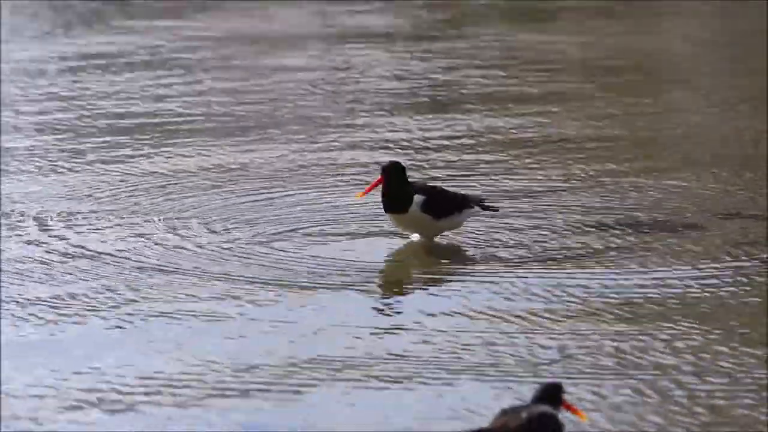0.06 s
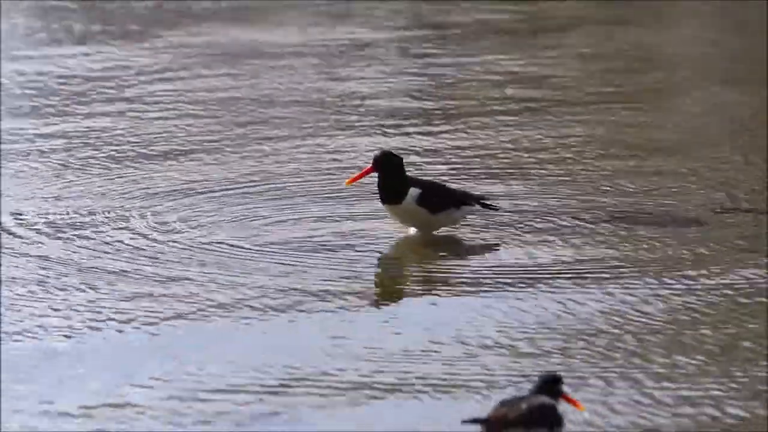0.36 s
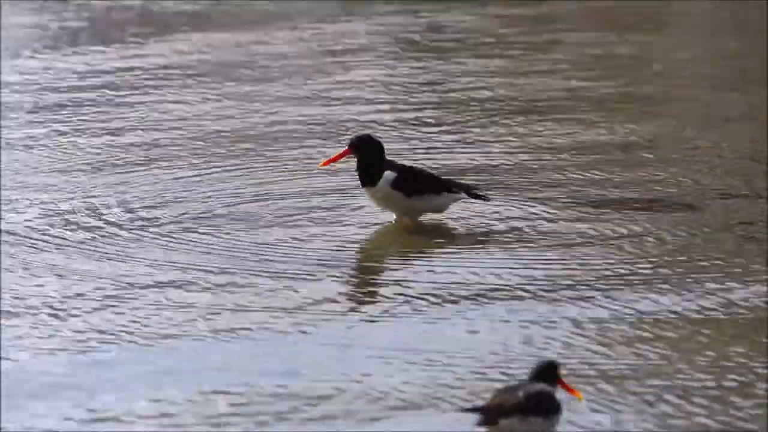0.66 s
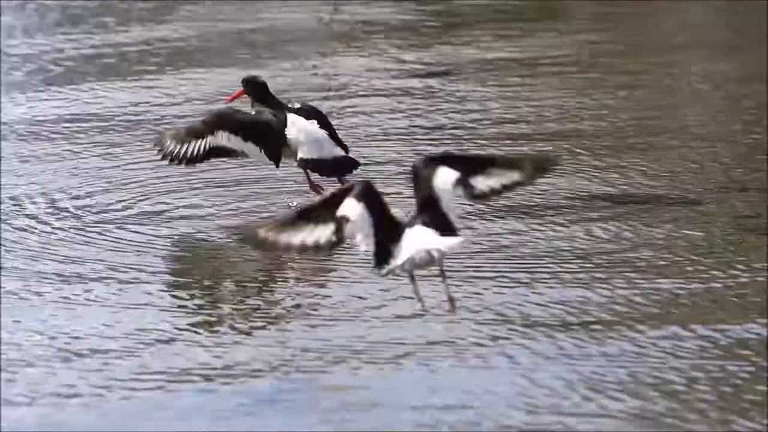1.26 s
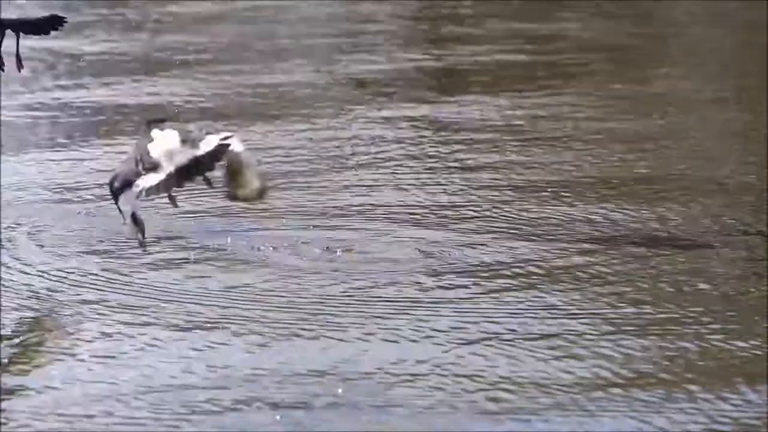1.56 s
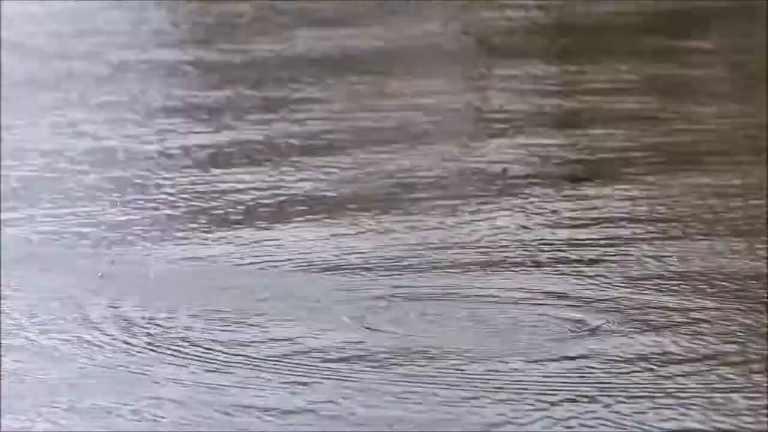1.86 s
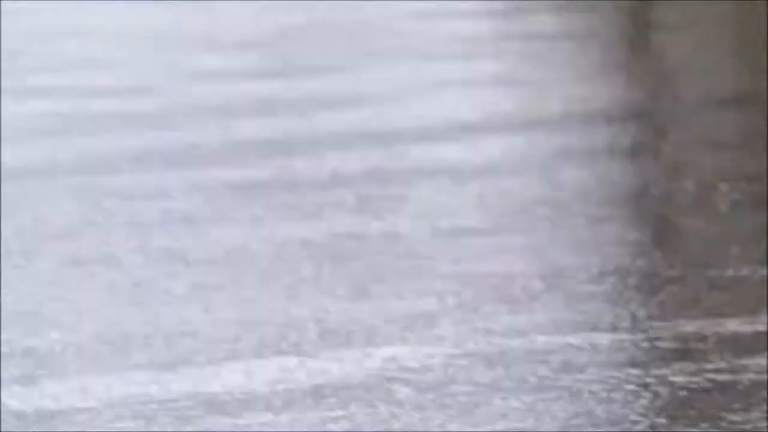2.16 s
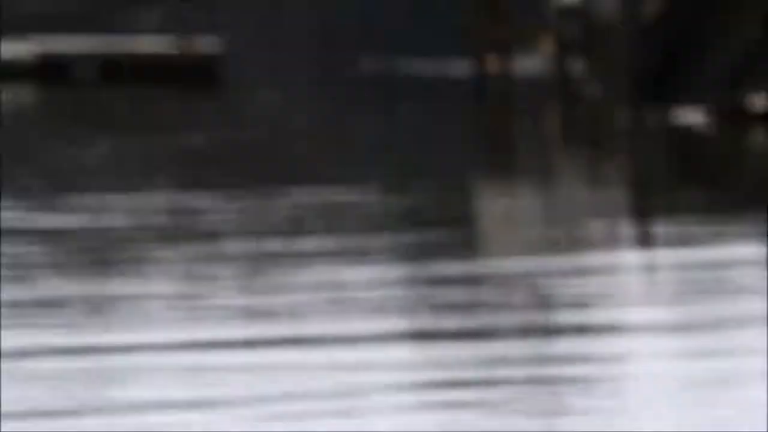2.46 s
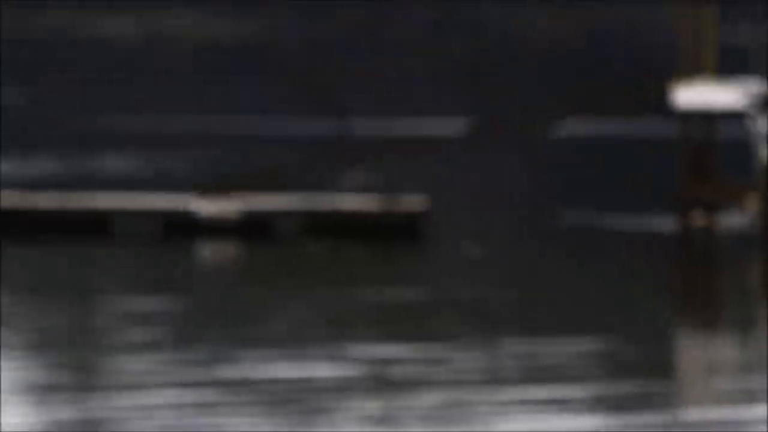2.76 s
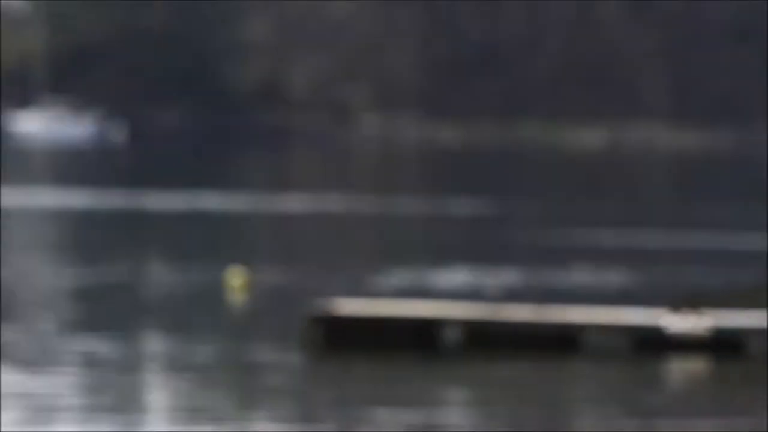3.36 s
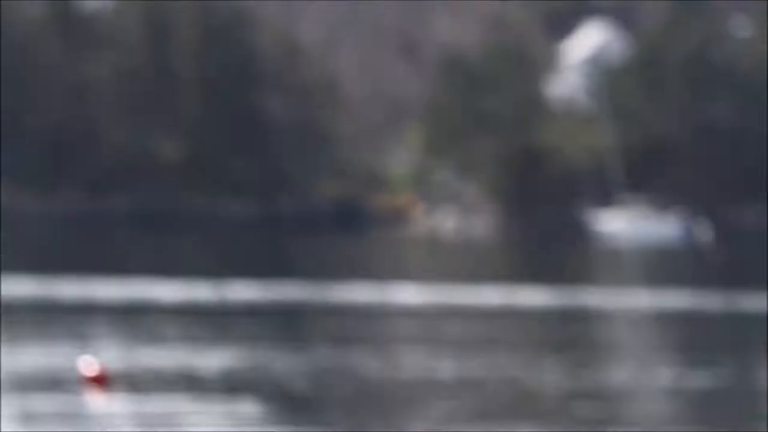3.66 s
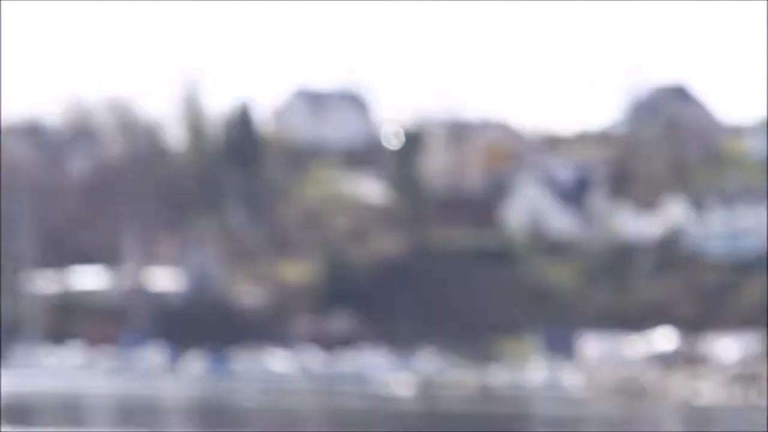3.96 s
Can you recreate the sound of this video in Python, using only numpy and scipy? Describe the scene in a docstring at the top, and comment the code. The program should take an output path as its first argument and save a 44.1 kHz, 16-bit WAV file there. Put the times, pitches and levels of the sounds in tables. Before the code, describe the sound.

Oystercatchers call on a quiet shore: one harsh rasp, then swishing wing beats with faint splashes and short chips, and finally two loud piping whistles with a slight echo. Ripples lap and light wind buffets the microphone.

```python
"""Light wind buffets the microphone and ripples lap on a quiet shore, where oystercatchers are wading. One
gives a harsh, rasping call that ends in a short clear note; they take off with swishing wing beats, drops and
spray, and chip in flight, with two faint bird notes far away. Two loud two-part piping whistles close the
scene, and the shore scatters them back slightly raised in pitch by the bird's flight."""
import sys
import numpy as np
from scipy import signal
from scipy.io import wavfile
from scipy.ndimage import uniform_filter1d

SR = 44100
rng = np.random.default_rng(int(sys.argv[2]) if len(sys.argv) > 2 else 0)


def unload_wav(signal):
    """Save mono or channel-first audio to the path in sys.argv[1] as 16-bit WAV at rate SR, clipped to [-1, 1]."""
    wavfile.write(
        sys.argv[1],
        SR,
        np.round(np.clip(np.atleast_2d(signal).T, -1, 1) * 32767).astype(np.int16),
    )


N = 176400
TIME = np.arange(N) / SR
STIRRED = TIME > 1.151   # the birds stir the water from just before the first wing beat


def from_db(db):
    """Decibels to gain."""
    return 10 ** (np.asarray(db) / 20)


def unit_rms(x):
    """Scale to rms 1."""
    return x / np.sqrt(np.mean(x ** 2) + 1e-20)


def curves(rows):
    """Draw one curve for each column after the time column."""
    times, *columns = np.transpose(rows)
    return [np.interp(TIME, times, column) for column in columns]


def eq_db(eq, hz):
    """Read an EQ curve on a log frequency axis."""
    freqs, gains_db = np.transpose(eq)
    return np.interp(np.log(hz), np.log(freqs), gains_db)


def gate(rows):
    """Open from the first row to the last, with 2 ms fades."""
    return np.clip(np.minimum(TIME - rows[0][0], rows[-1][0] - TIME) / .002, 0, 1)


def drift(rate_hz):
    """Smooth random modulation at rms 1, made at a twentieth of the sample rate."""
    pole = np.exp(-40 * np.pi * rate_hz / SR)
    slow = signal.lfilter([1], [1, -2 * pole, pole * pole], rng.standard_normal(N // 20 + 2002))[2000:]
    return np.interp(np.arange(N) / 20, np.arange(len(slow)), unit_rms(slow))


def resonate(x, hz, width_hz):
    """A resonant band-pass with unity gain at its peak."""
    r = np.exp(-np.pi * width_hz / SR)
    feedback = [1, -2 * r * np.cos(2 * np.pi * hz / SR), r * r]
    return signal.lfilter(np.array([1, 0, -1]) * (1 - r * r) / 2, feedback, x + 1e-18)


def noise(eq):
    """Noise in roughly half-octave bands, each flickering by itself; rms 1."""
    low, high = eq[0][0], min(eq[-1][0], SR * .45)
    edges = np.geomspace(low, high, int(2 * np.log2(high / low)) + 2)
    out, white = 0, rng.standard_normal((2, N))
    for k, band in enumerate(zip(edges, edges[1:])):
        gain = from_db(eq_db(eq, np.sqrt(band[0] * band[1])) + 1.5 * drift(25))
        out += gain * signal.sosfilt(signal.butter(2, band, "band", fs=SR, output="sos"), white[k % 2])
    return unit_rms(out)


def grains(eq, per_s, spread_db, cycles, pitches):
    """Random clicks of uneven size, each ringing at one of the pitches for about `cycles`; rms 1."""
    hits = rng.random(N) < per_s / SR
    clicks = hits * from_db(spread_db * np.minimum(rng.exponential(1, N), 4)) * rng.choice([-1, 1], N)
    out, dealt = 0, rng.integers(0, pitches, N)
    for k, hz in enumerate(np.geomspace(eq[1][0], eq[-2][0], pitches)):
        out += from_db(eq_db(eq, hz)) * resonate(clicks * (dealt == k), hz, 1.35 * hz / cycles)
    return unit_rms(out)


# The wind's fader. Each row: time in seconds, relative level in dB.
WIND_FADER = [(0, -64), (.5, -55.5), (.56, -54.5), (1.08, -52), (1.17, -45), (2.08, -46), (2.55, -50.5),
              (2.8, -42.5), (3.72, -50), (3.82, -51)]
# Its low rumble. Each row: frequency in Hz, gain in dB.
WIND_EQ = [(20, -10), (40, -1.5), (70, 3), (130, -4), (200, -7.5), (300, -26), (500, -26)]
# Thumps of air. Each row: centre in seconds, level in dB, half-width in seconds.
BUFFETS = [(0.558, -35, 0.022), (0.757, -27, 0.004), (1.12, -33.5, 0.0081), (1.188, -34, 0.011),
           (1.346, -31.5, 0.0076), (1.459, -26.5, 0.0041), (1.499, -25.5, 0.018), (1.528, -22.5, 0.0028),
           (1.551, -29, 0.0083), (1.678, -37, 0.0091), (1.824, -40, 0.013), (2.025, -39, 0.0067),
           (2.054, -30, 0.008), (2.111, -35, 0.01), (2.158, -30.5, 0.0096), (2.864, -29, 0.0069),
           (3.078, -30.5, 0.01), (3.377, -29, 0.0084), (3.733, -25, 0.0095)]

def wind(buffet_hz=117.2):
    """Wind on the microphone: a lumpy rumble, with eddies that hit as short, low buffets."""
    db, = curves(WIND_FADER)
    out = from_db(db + 5.5 + 2.5 * drift(7.2)) * noise(WIND_EQ)
    for centre, level_db, half_width in BUFFETS:
        swell = np.exp(-.5 * np.minimum(((TIME - centre) / half_width) ** 2, 100))
        rumble = resonate(rng.standard_normal(N), buffet_hz, width_hz=55)
        eddy = swell * resonate(rumble, buffet_hz, width_hz=110)
        out += from_db(level_db) * eddy * np.sqrt(np.sum(swell ** 2) / np.sum(eddy ** 2))
    return out


# The ripples' fader. Each row: time in seconds, relative level in dB.
LAP_FADER = [(0, -54), (1.0, -54), (1.53, -51.5), (1.85, -51.5), (2.55, -54), (3.15, -52.5), (3.3, -44),
             (3.45, -53.5), (3.67, -46.5), (3.8, -51)]
# Their dark wash. Each row: frequency in Hz, gain in dB.
LAP_EQ = [(250, 4.5), (400, -0.5), (650, -4), (1000, -4), (1900, -8), (3000, -20.5), (5000, -23)]

def lapping():
    """Ripples wash the shore; small bubbles ring in them once the birds stir the water."""
    db, = curves(LAP_FADER)
    wash = from_db(1) * noise(LAP_EQ)
    bubbles = from_db(-4.5) * grains(LAP_EQ, per_s=180, spread_db=2.2, cycles=17, pitches=24)
    return from_db(db) * (wash + STIRRED * bubbles)


# The fader for trickle and spray. Each row: time in seconds, relative level in dB.
SPRAY_FADER = [(0, -66), (1.1, -66.5), (1.2, -60.5), (1.5, -60.5), (1.9, -60), (2.1, -62), (2.9, -67.5),
               (3.25, -60), (3.5, -61), (4.0, -60.5)]
# Their bright fizz. Each row: frequency in Hz, gain in dB.
SPRAY_EQ = [(2500, 0.5), (4000, -3.5), (7000, -7.5), (11000, -7.5), (13500, -10), (15800, -4)]

def spray():
    """A thin trickling hiss, joined by fine ticking droplets from the take-off on."""
    db, = curves(SPRAY_FADER)
    hiss = from_db(4.5) * noise(SPRAY_EQ)
    droplets = from_db(-1) * grains(SPRAY_EQ, per_s=700, spread_db=7.5, cycles=4, pitches=14)
    return from_db(db) * (hiss + STIRRED * droplets)


# The harsh call's contour. Each row: time in seconds, pitch in Hz, relative level in dB,
# buzz in dB (the gain on every harmonic but the leading one).
HARSH_CONTOUR = [(.558, 353, -57, 6), (.573, 361, -41.5, -3), (.60, 404.4, -39.5, -1),
                 (.65, 397.5, -39, -4), (.70, 384.3, -44.5, 2), (.75, 370, -42, -3.5),
                 (.81, 367.5, -41.5, -5.5), (.85, 343, -43, -10), (.885, 345, -40, -11),
                 (.925, 345.6, -48, -6)]
# The throat's formants. Each row: frequency in Hz, gain in dB.
THROAT_EQ = [(800, -23), (1200, -10.5), (1520, -21), (1680, -1), (1900, 0), (2400, -8), (2540, -28),
             (2750, -11), (2980, -22), (3130, -17), (3700, -30)]

def harsh_call(leading_harmonic=5, rasp_sweep=.13, rasp_depth=.25):
    """A buzzing voice that clears as it falls; each rasp cycle sweeps its pitch up and chokes it."""
    pitch, db, buzz_db = curves(HARSH_CONTOUR)
    rasp_hz = 64 - 23 * (TIME - HARSH_CONTOUR[0][0])
    cycle = np.cumsum(rasp_hz) / SR % 1
    sweep = 1 + rasp_sweep * (uniform_filter1d(cycle, size=150) - .5)
    hz = pitch * sweep * (1 + .008 * drift(390))
    phase = 2 * np.pi * np.cumsum(hz) / SR
    voice = 0
    for k in range(2, 10):
        harmonic_db = eq_db(THROAT_EQ, k * hz) + (k != leading_harmonic) * (buzz_db + 2.5 * drift(200))
        voice += np.sqrt(2) * from_db(harmonic_db) * np.sin(k * phase + .5 * drift(60))
    breath = .15 * unit_rms(resonate(rng.standard_normal(N), hz=1830, width_hz=140))
    choke = 1 - rasp_depth * np.cos(2 * np.pi * cycle)
    return (voice + breath) * choke * from_db(db) * gate(HARSH_CONTOUR)


# Short chips. Each row: peak time, rise and fall in seconds, top pitch in Hz, pitch sag at the start
# and at the end as fractions, then the levels of harmonics 1 to 5 in dB.
CHIPS = [(0.91, .06, 0.057, 1186, 0.15, 0.15, -63, -47, -60.5, -72, -71),
         (1.711, 0.024, 0.0057, 2592, 0.15, .04, -42.5, -49.5, -50.5, -49, -50),
         (2.127, 0.016, .025, 2673, .13, .14, -53.5, -35, -59, -46.5, -53),
         (2.961, 0.023, 0.0068, 2690, 0.77, 0.087, -40.5, -53.5, -73, -59, -57),
         (3.695, 0.019, 0.017, 2710, .13, 0.15, -43, -51, -63, -78, -81)]

def chips():
    """Short notes rich in fluttering overtones, each one lopsided arch of pitch and level."""
    out, waver = 0, 1 + .009 * drift(170)
    flutters = [from_db(3.5 * drift(150)) for _ in range(5)]
    for peak, rise, fall, top_hz, start_sag, end_sag, *levels in CHIPS:
        rising = TIME < peak
        droop = np.clip((TIME - peak) / np.where(rising, rise, fall), -1, 1) ** 2
        hz = top_hz * (1 - np.where(rising, start_sag, end_sag) * droop) * waver
        phase = 2 * np.pi * np.cumsum(hz) / SR
        tone = sum(from_db(db) * flutters[k - 1] * np.sin(k * phase) for k, db in enumerate(levels, 1))
        out += np.sqrt(2) * (1 - droop) * tone
    return out


# The hollow tone of churned water. Each row: frequency in Hz, gain in dB.
CHURN_EQ = [(250, -6), (330, 6), (450, 5), (700, -21.5), (1000, -14)]

def churn(centre_s=1.518, half_width_s=.21):
    """Low gurgles swell and fade as the birds push off."""
    swell = from_db(-44) * np.exp(-.5 * ((TIME - centre_s) / half_width_s) ** 2)
    return swell * grains(CHURN_EQ, per_s=150, spread_db=3.7, cycles=17.9, pitches=10)


# Single drops and plops. Each row: start in seconds, peak level in dB, pitch in Hz.
DROPS = [(1.247, -36.5, 4200), (1.317, -36.5, 6500), (1.354, -42, 3700), (1.452, -35.5, 2170),
         (1.661, -37, 3240), (1.775, -33, 3900), (1.8, -43, 7460), (1.992, -36.5, 8460),
         (2.021, -31.5, 4360), (2.255, -34.5, 4860), (2.667, -37, 1220), (2.903, -40, 820),
         (3.292, -33.5, 10000), (3.937, -23.5, 890)]

def drops(t60_s=.02):
    """Each drop is a tiny splat that rings briefly."""
    out = 0
    for start, db, hz in DROPS:
        decay = (TIME >= start) * from_db(-60 * np.clip((TIME - start) / t60_s, 0, 2))
        plop = resonate(decay * rng.standard_normal(N), hz, width_hz=.27 * hz)
        out += from_db(db) * plop / np.max(np.abs(plop) + 1e-12)
    return out


# Downstrokes. Each row: centre in seconds, relative level in dB.
WING_BEATS = [(1.251, -37), (1.356, -35), (1.461, -38), (1.568, -42), (1.671, -42), (1.779, -41.5),
              (1.888, -48)]
# Their airy swish. Each row: frequency in Hz, gain in dB.
SWISH_EQ = [(300, 0), (1500, 5.5), (4000, 9.5), (8000, 1.5), (12000, -3), (15500, -11)]

def wings():
    """Each downstroke is a brief, crackly swish, softer-edged as the bird climbs away."""
    strokes = 0
    for centre, db in WING_BEATS:
        half_width_s = .004 + .007 * (centre - WING_BEATS[0][0])
        strokes += from_db(db - 5) * np.exp(-.5 * ((TIME - centre) / half_width_s) ** 2)
    swish = noise(SWISH_EQ)
    crackle = from_db(-1) * grains(SWISH_EQ, per_s=2600, spread_db=5, cycles=5.2, pitches=12)
    return strokes * (swish + crackle)


# Distant calls. Each row: centre in seconds, length in seconds, pitch in Hz, level in dB.
FAR_CALLS = [(2.087, 0.11, 1708, -53.5), (3.107, .1, 1970, -58)]

def far_birds():
    """Thin wavering notes from across the water."""
    out, waver = 0, 1 + .025 * drift(120)
    for centre, length, hz, db in FAR_CALLS:
        arch = np.clip(1 - (2 * (TIME - centre) / length) ** 2, 0, 1)
        out += from_db(db) * arch * np.sqrt(2) * np.sin(2 * np.pi * np.cumsum(hz * waver) / SR)
    return out


# The two piping calls, one list each. Each row: time in seconds, pitch in Hz, level in dB.
PIPE_CONTOURS = [
    [(3.349, 2246, -31), (3.356, 2750, -21), (3.362, 3160, -18.5), (3.369, 3193, -16), (3.376, 3124, -17.5),
     (3.386, 2620, -23), (3.398, 1876, -36.5), (3.410, 2620, -20.5), (3.416, 3297, -16), (3.430, 3347, -19),
     (3.458, 3282, -18), (3.470, 3134, -21), (3.478, 2750, -21), (3.488, 1970, -36.5)],
    [(3.877, 2270, -31), (3.884, 2770, -23), (3.890, 3160, -21), (3.897, 3110, -18.5), (3.903, 3083, -23),
     (3.913, 2456, -25.5), (3.921, 2170, -36.5), (3.931, 2530, -23), (3.937, 3240, -18.5),
     (3.949, 3298, -18), (3.974, 3254, -19.5), (3.987, 3160, -20.5), (4.0, 2810, -24.5), (4.012, 2060, -51)],
]
# The base mix of harmonics 2 to 4, in dB against the fundamental.
PIPE_OVERTONES_DB = [-26, -39, -49]
# The brightness ride on that mix. Each row: time in seconds, overtone gain in dB.
PIPE_BRIGHTNESS = [(3.36, -1), (3.42, 1), (3.455, 11), (3.49, -6.5), (3.89, -3), (3.96, 0), (4.0, 0)]

def piping():
    """A nearly pure whistle: a short arch, a dip, then a longer arch."""
    bright_db, = curves(PIPE_BRIGHTNESS)
    out = 0
    for call in PIPE_CONTOURS:
        pitch, db = curves(call)
        hz = uniform_filter1d(pitch, size=130) * (1 + .003 * drift(167))
        phase = 2 * np.pi * np.cumsum(hz) / SR
        tone = np.sin(phase)
        for k, base_db in enumerate(PIPE_OVERTONES_DB, 2):
            gain = from_db(base_db + bright_db + 2 * drift(55))
            tone += gain * np.sin(k * (phase + .12 * drift(300)))
        out += np.sqrt(2) * tone * gate(call) * from_db(db + .7 * drift(70))
    return out


def shore_echo(x, flying, paths, fade_db_per_s=25.5):
    """Many weak reflections; a flying bird's come back higher the later they are, up to a limit."""
    out, energy = 0, 0
    pivot_s = PIPE_CONTOURS[0][-1][0]   # echoes are sped up around the end of the first piping call
    for k, (place, scatter) in enumerate(rng.random((paths, 2))):
        delay = .019 + .7 * (k + place) / paths
        speed = 1 + flying * min(.18 * delay, .068) * (1 - .38 * scatter ** 2)
        gain = from_db(-fade_db_per_s * delay)
        out += gain * np.interp(pivot_s + (TIME - delay - pivot_s) * speed, TIME, x, left=0, right=0)
        energy += gain ** 2
    return out / np.sqrt(energy)


def scene():
    """A mono mix of the calls and their echoes with wings, water and wind."""
    pipes, peeps, other_calls = piping(), chips(), harsh_call() + far_birds()
    echo_send = from_db(-15) * peeps + from_db(-8) * resonate(other_calls, hz=1900, width_hz=2700)
    echoes = from_db(-19) * shore_echo(pipes, flying=True, paths=90)
    echoes += shore_echo(echo_send, flying=False, paths=50)
    birds = pipes + peeps + other_calls + echoes + wings()
    water = drops() + lapping() + spray() + churn()
    return (birds + water + wind())[None]


def record(dry):
    """A steep low-pass cuts the top above 15.8 kHz."""
    return signal.sosfilt(signal.ellip(12, .1, 80, 15800, fs=SR, output="sos"), dry)


dry = scene()
out = record(dry)
unload_wav(out)
```